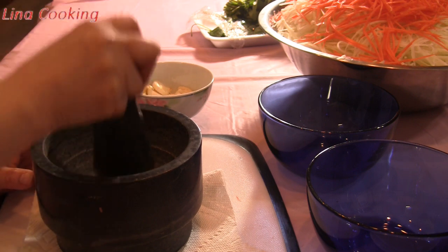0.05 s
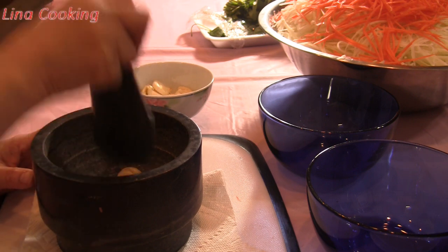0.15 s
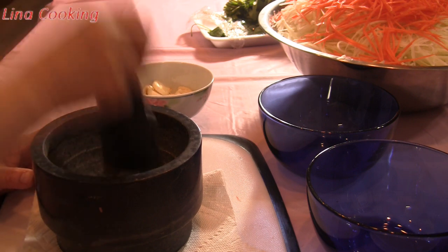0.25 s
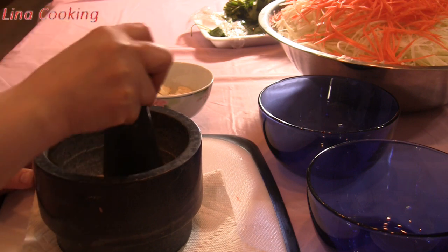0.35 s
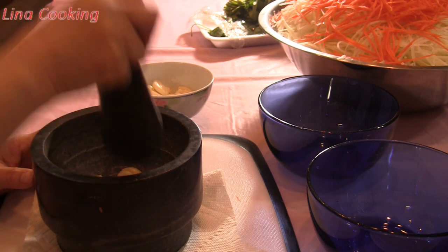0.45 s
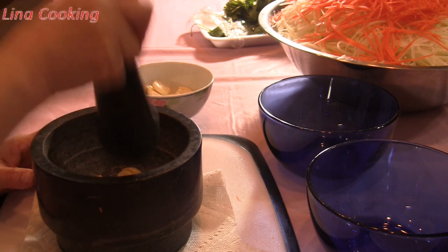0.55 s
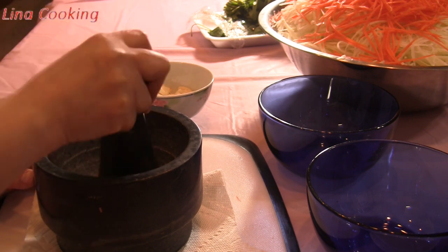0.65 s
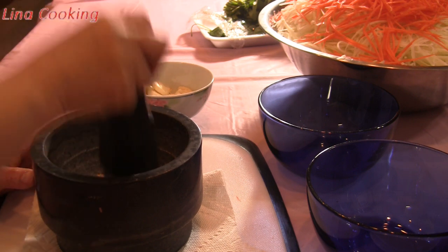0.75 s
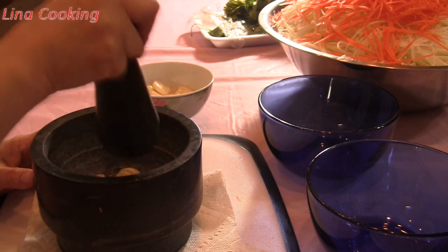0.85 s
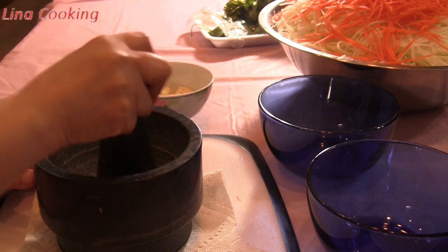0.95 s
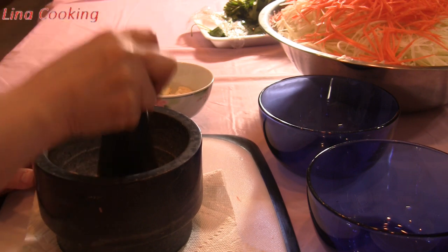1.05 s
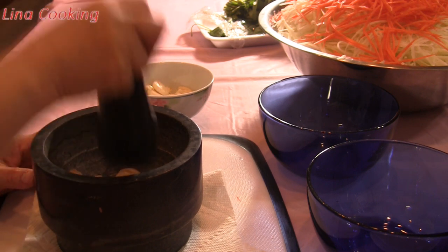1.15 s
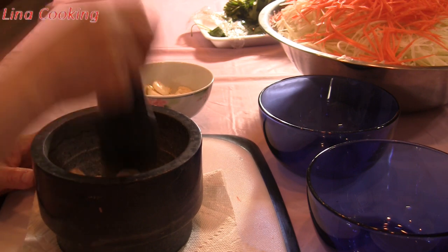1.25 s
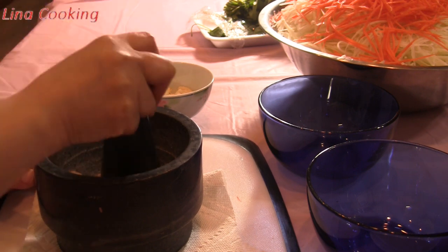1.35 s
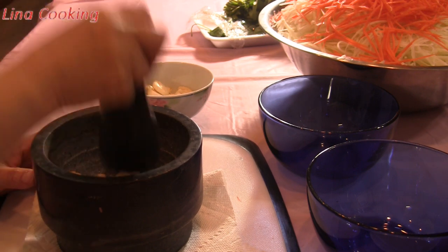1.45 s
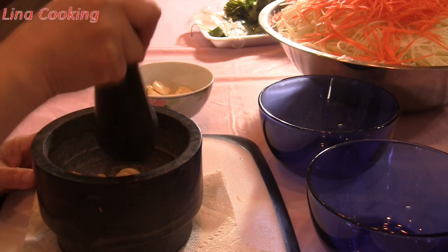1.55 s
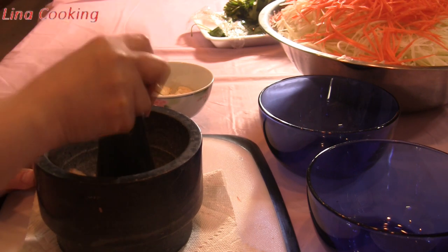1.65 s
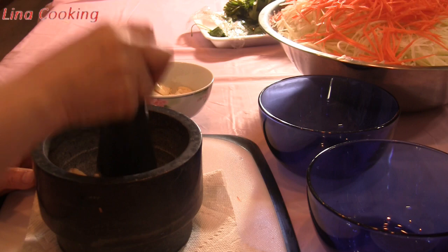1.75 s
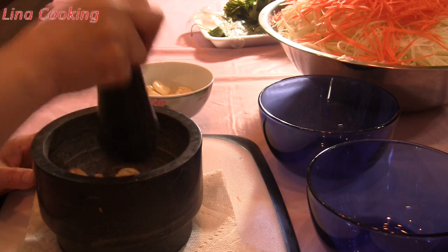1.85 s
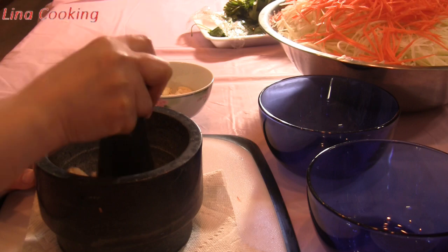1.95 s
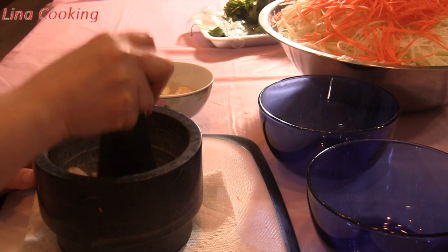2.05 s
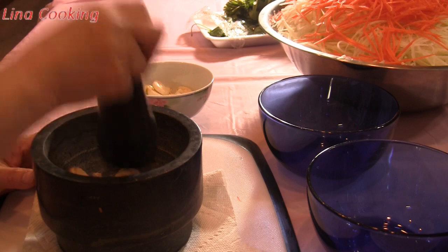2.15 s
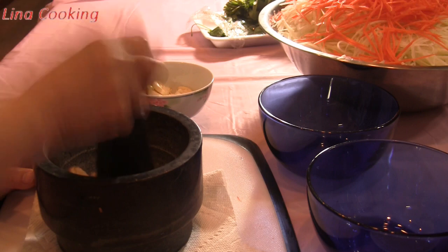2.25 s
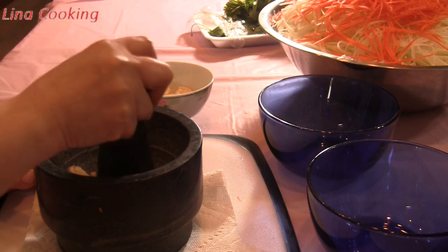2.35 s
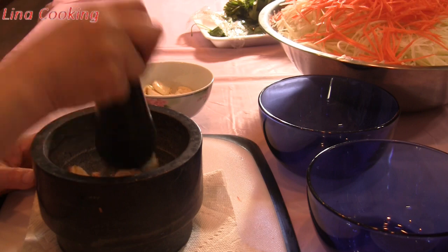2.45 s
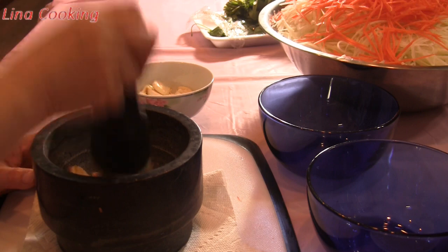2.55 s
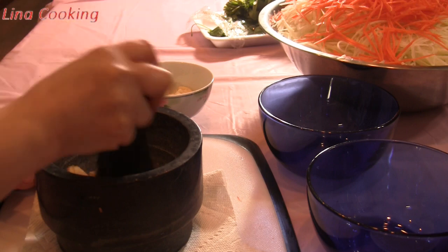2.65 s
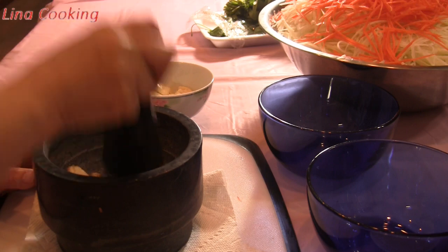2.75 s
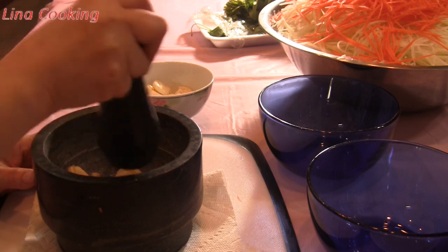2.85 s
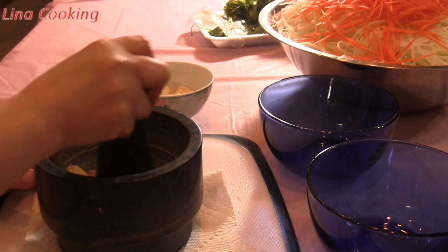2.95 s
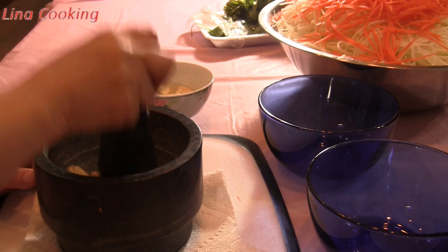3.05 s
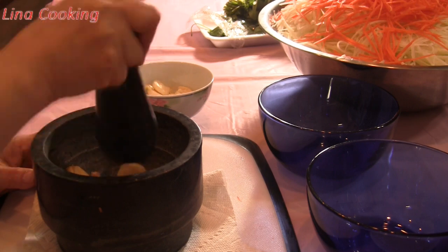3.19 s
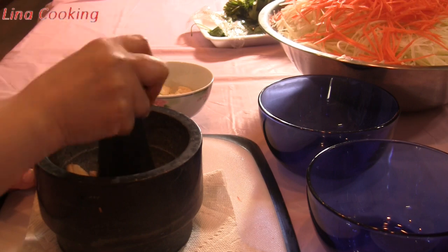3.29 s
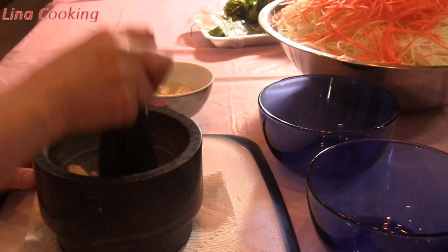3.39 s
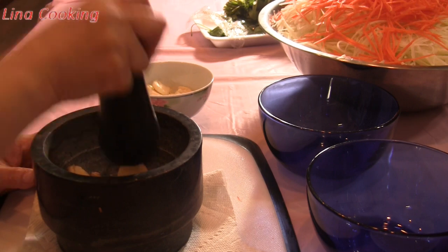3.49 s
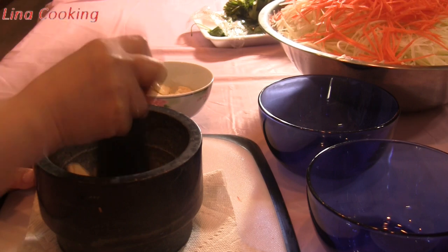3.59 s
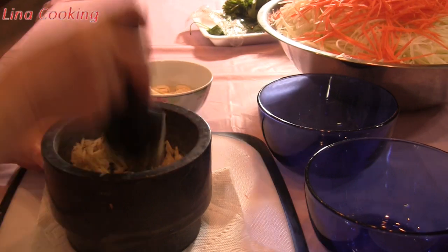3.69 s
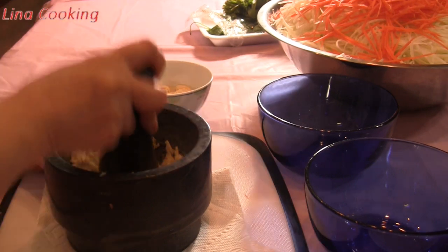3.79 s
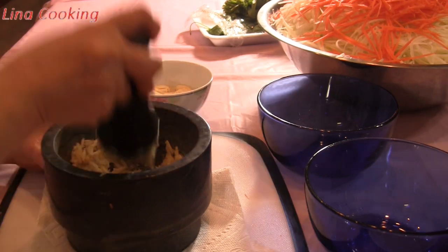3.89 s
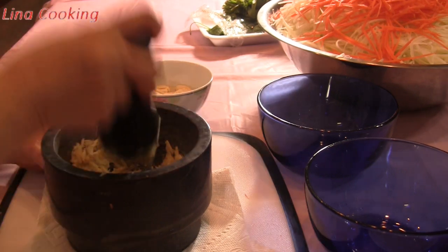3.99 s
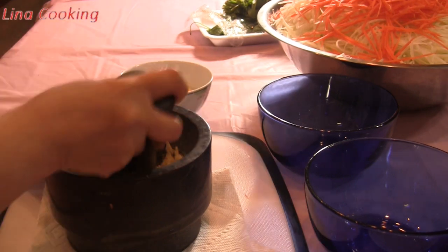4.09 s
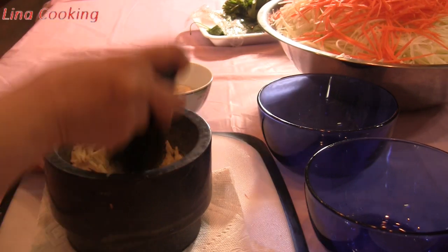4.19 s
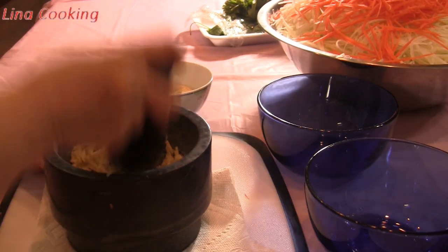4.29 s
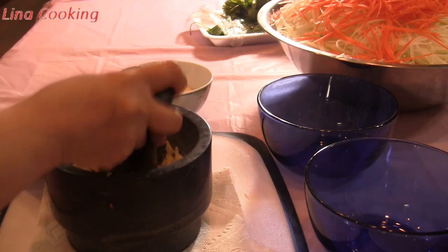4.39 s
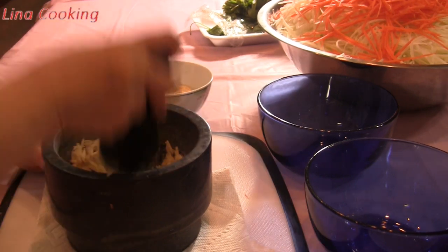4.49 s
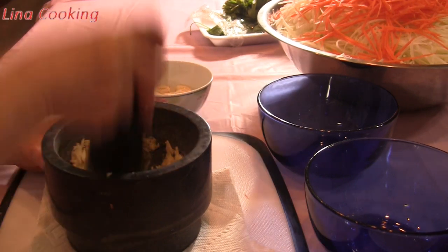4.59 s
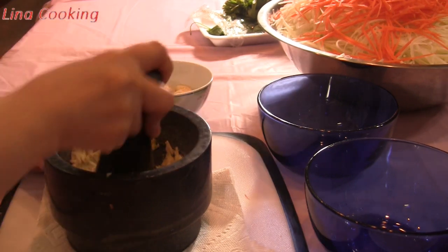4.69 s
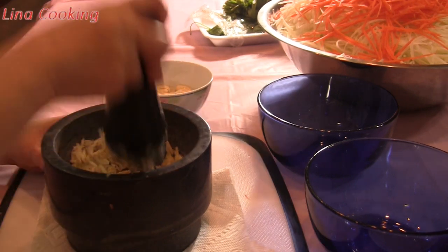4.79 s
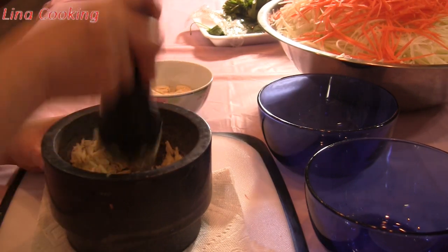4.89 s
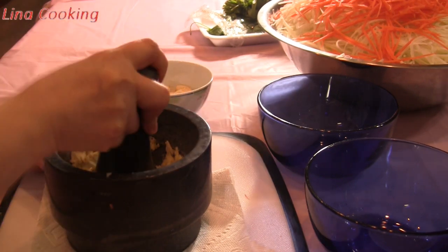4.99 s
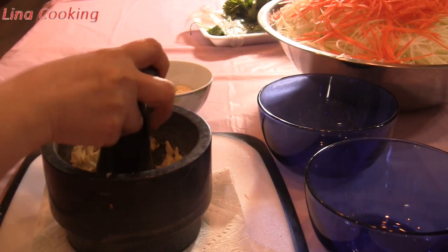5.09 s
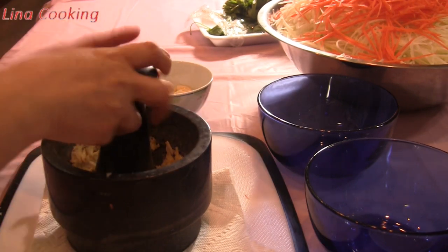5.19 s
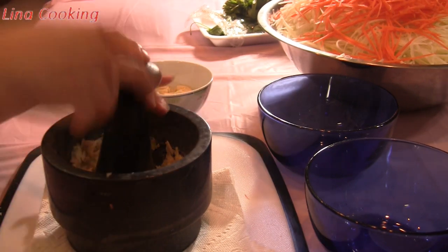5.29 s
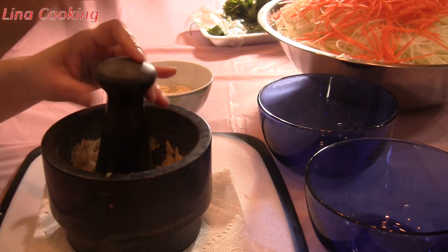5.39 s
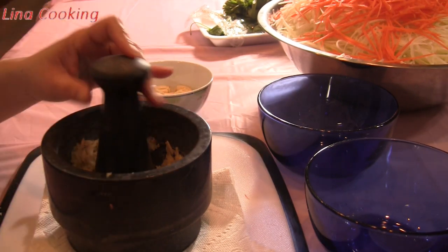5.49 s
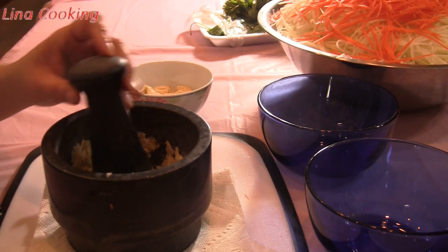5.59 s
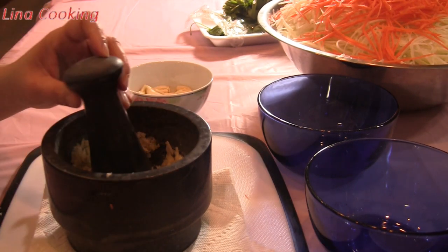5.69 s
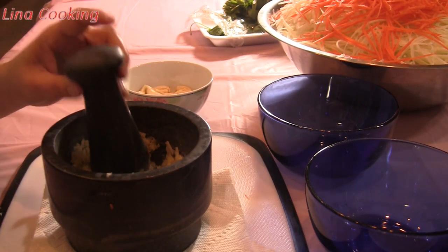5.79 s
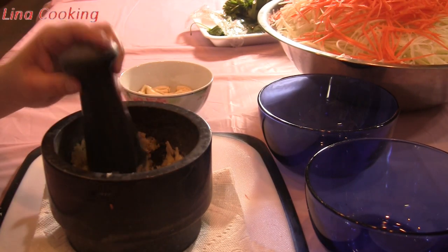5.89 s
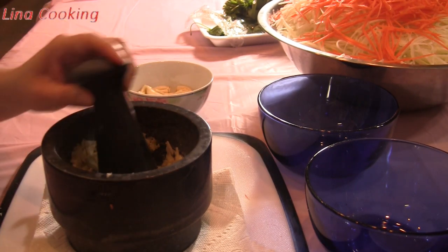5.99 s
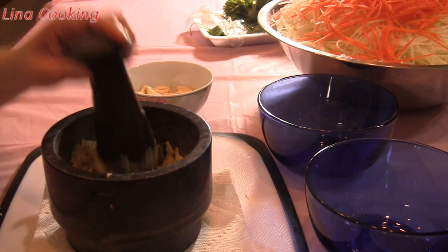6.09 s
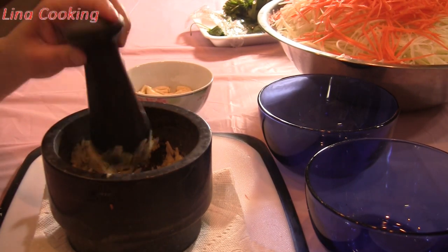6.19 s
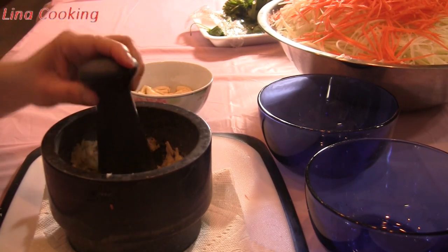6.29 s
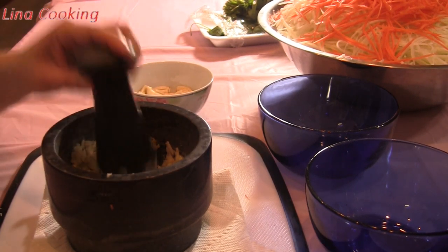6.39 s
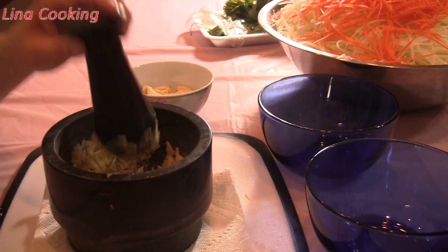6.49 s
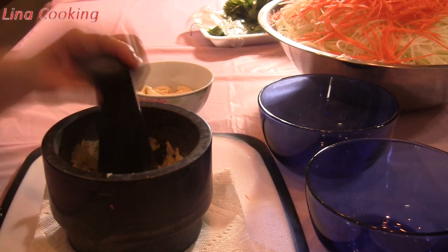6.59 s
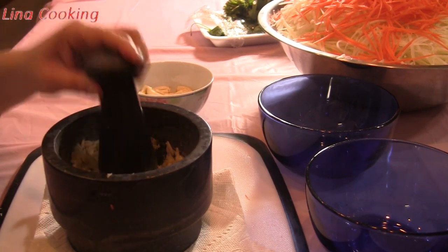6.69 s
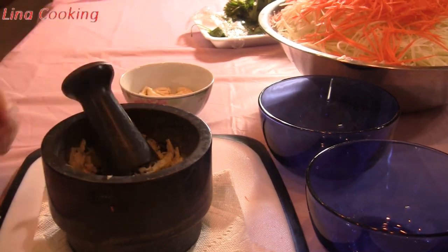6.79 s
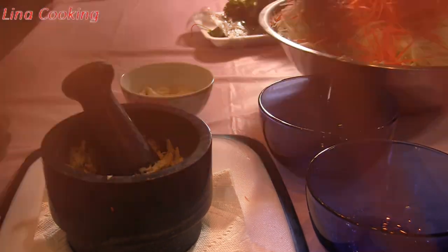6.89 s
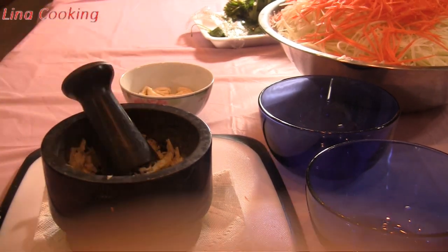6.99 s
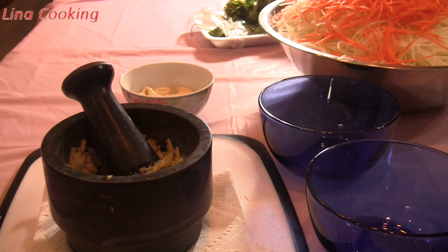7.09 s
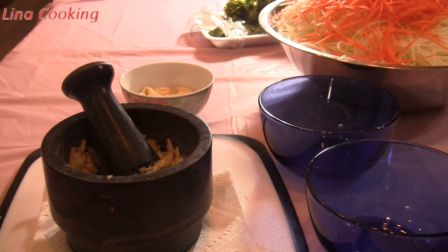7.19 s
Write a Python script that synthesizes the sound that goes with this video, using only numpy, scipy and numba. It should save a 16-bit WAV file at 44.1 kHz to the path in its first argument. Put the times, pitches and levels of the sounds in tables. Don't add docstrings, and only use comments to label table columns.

```python
import sys
import numpy as np
from scipy import signal
from scipy.fft import rfft, irfft, next_fast_len
from scipy.io import wavfile
from scipy.ndimage import uniform_filter1d, map_coordinates
from numba import njit

SR = 44100
rng = np.random.default_rng(int(sys.argv[2]) if len(sys.argv) > 2 else 0)


def magnitude_from_level(level_db):
    exponent = np.asarray(level_db, float) / 20
    return 10 ** exponent


def pcm_store(signal):
    levels = np.round(np.clip(np.atleast_2d(signal), -1, 1) * 32767)
    wavfile.write(sys.argv[1], SR, levels.astype(np.int16).T)


N = 319739
FADE = np.log(1000)

SHOT_STARTS_S = [0, 3.772, 6.858]
SHOT_FADES_S = [0.028, 0.00064, .001]

# frequency in Hz, density in dB per Hz.
AIR = [(15, -47), (25, -3.5), (123, -7.5), (200, -9.5), (503, -15.5), (863, -25), (1070, -24.5),
       (1190, -27.5), (1560, -27.5), (2350, -32), (2760, -33), (3160, -32.5), (16000, -44.5)]
AIR_DB, AIR_ALIKE_HZ = -48, 1415

# time the pestle bottoms out in seconds, force in dB,
# cushion in dB off the bite, crunch level in dB, crunch colour in Hz.
THUDS = [(0.0342, -37.5, 30, -14, 3010), (0.344, -25, 25.5, -20, 3060), (0.6717, -20, 21, -13.5, 1900),
         (1.0123, -11, 11.5, -15, 1800), (1.3573, -14, 11.5, -18, 3060), (1.6929, -10, 5.5, -13.5, 1660),
         (2.018, -10, 3, -15, 3080), (2.334, -9.5, 13, -16.5, 2940), (2.6602, -19.5, 14.5, -25.5, 2050),
         (2.9974, -11, 10.5, -17.5, 1950), (3.3245, -9, 13, -12, 5400), (3.6572, -14.5, 14, -16, 3900),
         (4.0923, -10.5, 8.5, -13.5, 4870), (4.683, -22.5, 15.5, -14, 5800), (5.982, -33, 18.5, -28, 5160),
         (6.3179, -28.5, 14, -17.5, 5250)]
# frequency in Hz, level in dB, T60 in seconds.
MAT_BOUNCE = [(212.4, 5.5, 0.025), (121.5, -1, 0.065), (420, -7, 0.007)]
# frequency in Hz, level in dB, T60 in seconds.
BOWL_AIR = [(766, 4.5, 0.024), (1088, -0.5, 0.0075), (1760, -4.5, 0.0073)]
# frequency in Hz, level in dB, T60 in seconds.
TABLE_MODES = [(84.6, -1.5, 0.37), (134.5, -12.5, 0.35), (173.4, 2.5, 0.17), (229, -4.5, 0.32),
               (253.5, -9.5, 0.48), (353, -6, 0.097), (384.3, 4, 0.11), (459, -14.5, 0.53)]
# frequency in Hz, density in dB per Hz.
TABLE_SHAKE = [(26, -49), (45, -17.5), (135, -0.5), (226, -10.5), (266, -16.5), (317, -11.5), (401, -17),
               (492, -21.5), (537, -21), (787, -22.5), (859, -34), (1500, -41), (1950, -72), (3300, -120)]
# frequency in Hz, density in dB per Hz.
CRUNCH = [(500, -26), (1000, -20.5), (1700, -10.5), (2400, -13), (3300, -9), (5000, -11), (8000, -8),
          (12000, -14), (15600, -10), (16500, -56)]
# frequency in Hz, density in dB per Hz.
PASTE = [(700, 2), (1500, -20.5), (2600, -7), (5000, -7), (8500, -7), (12000, -10), (15600, -25),
         (16500, -52.5)]
BURST_MS, SLOWEST_BURST_MS, BURST_STRETCH, SHARP_DB = 22.6, 87, 1.63, -14.5
CLOVE_PEAK_DB = 5.5
SINK_MS, SINK_MS_PER_DB, FIRM_DB, DEEPEST_DB = 3.0, 0.11, -10.5, 11
SAME_SHAKE = 0.55
DULL_PER_DB = 0.243
PASTE_MUFFLE = 0.47

# start in seconds, ring level in dB, pitch in Hz, spit level in dB.
TICKS = [(0.032, -23.5, 3030, -52), (0.045, -22, 2730, -34), (0.366, -31.5, 730, -50),
         (0.692, -25, 740, -52), (5.229, -47, 1140, -53), (5.38, -41.5, 1120, -51), (5.438, -58, 1100, -50),
         (5.454, -48, 1090, -43), (5.613, -54, 710, -48), (6.015, -43, 2910, -40), (6.047, -41, 2570, -50),
         (6.059, -43, 810, -42.5), (6.185, -39, 820, -63), (6.206, -40, 820, -65), (6.234, -44, 820, -59),
         (6.251, -34.5, 880, -56), (6.353, -32, 2600, -42), (6.529, -21, 1002, -41.5),
         (6.989, -33.5, 2400, -44.5), (7.077, -41, 716, -60), (7.174, -56, 3060, -42.5)]
TICK_T60_S, TICK_DAMPING = 0.015, 0.55

# start in seconds, crack, thump, mortar ring and pestle ring, all in dB.
KNOCKS = [
    (3.7824, 12, 0, -28.5, -28),
    (4.4002, 12.5, -1.5, -16.5, -30.5),
    (5.0050, 7, -3, -44, -48),
    (6.6626, 4, -9, -21, -32.5),
]
# frequency in Hz, level in dB, T60 in seconds.
CRACK = [(1140, 6.5, 0.0083), (715, -1, 0.0043), (1362, 1.5, 0.009), (1900, 6, 0.0024), (2400, 1, 0.0029),
         (3130, 1.5, 0.0016), (5620, -11, 0.00183), (9740, -12, .002)]
# frequency in Hz, density in dB per Hz.
GRIT = [(500, -11.5), (1500, 4.5), (2800, -2.5), (6000, -7.5), (12000, -15.5), (16500, -39)]
GRIT_DB, GRIT_T60_S = -15, 0.0074
MORTAR_HZ = [4104, 4100, 1147, 3138, 8338]
# level in dB, T60 in seconds.
MORTAR = [(4, .23), (-13, .5), (-7, .5), (-18, .4), (-4, .2)]
PESTLE_HZ = [8311, 8277, 8251, 12413, 12441, 13048, 13075, 13106, 13577, 9640, 11620]
# level in dB, T60 in seconds.
PESTLE = [(-8, .5), (-8, .5), (-9, .4), (-5, .4), (-7, .36), (-9, .4), (-8, .4), (-9, .4), (-17, .3),
          (-21, .3), (-21, .3)]
# frequency in Hz, gain in dB.
STONE_THUMP = [(60, -22), (130, -11), (230, 0)]
LEAD_DB, LEAD_PER_DB = 10, 2.24
GRIP_RATE, GRIP_DB = 110, 5.5

# peak time in seconds, level in dB, rise in seconds, fall in seconds.
RUSTLING = [
    (5.36, -60.5, 0.28, 0.97),
    (5.644, -53.5, 0.36, 0.34),
    (5.89, -44, 0.035, 0.072),
    (5.975, -43, .03, .2),
    (6.254, -41, 0.017, 0.014),
    (7.08, -51, .05, 0.17),
    (7.181, -42, .022, 0.14),
]
# frequency in Hz, density in dB per Hz.
RUSTLE = [(1200, -14), (2500, -3), (4000, -3), (7500, -1.5), (11000, 0.5), (15500, -7.5), (16500, -32.5)]
RUSTLE_RANGE_DB = 30
# start in seconds, length in seconds, level in dB, pitch in Hz.
DRAGS = [
    (5.753, 0.074, -43, 257),
    (5.767, 0.09, -45.5, 484),
    (5.767, 0.044, -54.5, 1090),
    (7.054, 0.068, -45, 580),
    (7.055, 0.12, -55.5, 2150),
    (7.134, 0.046, -49, 580),
    (7.185, 0.031, -51, 580),
    (7.211, 0.031, -46, 576),
]

# frequency in Hz, difference in dB.
PORTS = [(50, -4), (400, -4.5), (1200, -2), (2200, -7.5), (5000, -1), (14000, -2.5)]
PORT_LAG_S = 2.8e-5
# frequency in Hz, level in dB.
HOUSING = [(1200, -26), (3000, -9), (9000, -2), (15000, 2)]
HOUSING_DB, HOUSING_T60_S = -5, 0.005
# band frequency in Hz, level in dB, T60 in seconds.
KITCHEN = [(58.9, -12.5, 0.14), (142, -6.5, 0.52), (436, -7, 0.59), (693, -18.5, 0.87), (1470, -20.5, 0.74),
           (3230, -20, 0.68), (5540, -19.5, 0.82), (9000, -24, 0.56), (14000, -28, .35)]
# delay in ms, level in dB, frequency in Hz above which it is dull.
WALLS = [(12.58, -24.5, 5400), (14.46, -24.5, 500), (37.5, -20.5, 900)]
ROOM_ALIKE = 0.39
MIC_LOW_HZ = 66


def colour(x, points):
    hz, db = np.transpose(points)
    size = next_fast_len(x.shape[-1] + SR // 10)
    at = np.log(np.arange(size // 2 + 1) * SR / size + 1)
    gain = magnitude_from_level(np.interp(at, np.log(hz), db))
    return irfft(rfft(x, size) * gain, size)[..., :x.shape[-1]]


def unit(x):
    return x / np.sqrt(np.mean(x ** 2))


def ring(modes, push_ms, scatter_db=0., length_s=0.74, count=1):
    t = np.arange(int(length_s * SR)) / SR
    hz, db, t60 = np.transpose(modes)[:, :, None]
    db = db + scatter_db * rng.standard_normal(hz.shape)
    free = np.sum(magnitude_from_level(db) * np.sin(2 * np.pi * hz * t) * np.exp(-FADE * t / t60), axis=0)
    push = np.sin(count * np.pi * np.linspace(0, 1, int(push_ms * SR / 1000) + 3)[1:-1])
    if count > 1:
        push = push * np.linspace(0.2, 1, len(push))
    return signal.fftconvolve(free, push / np.abs(push).sum())[:len(t)]


def crackle(size, spread_db, points):
    snaps = rng.standard_normal(size) * magnitude_from_level(spread_db * rng.exponential(size=size))
    return unit(colour(snaps, points))


def patchy(size, rate, depth_db):
    k = int(SR / rate)
    steps = np.repeat(rng.standard_normal(size // k + 1), k)[:size]
    return magnitude_from_level(depth_db * uniform_filter1d(steps, k // 2 + 1))


def add(track, s, sound):
    i = max(int(s * SR), 0)
    stop = min([int(start * SR) for start in SHOT_STARTS_S if start > s] + [N])
    track[i:i + len(sound)][:stop - i] += sound[:stop - i]


def air():
    mid, side = colour(rng.standard_normal((2, N)), AIR)
    side = colour(side, [(50, -12), (AIR_ALIKE_HZ, -4), (8000, 0)])
    return magnitude_from_level(AIR_DB) * unit(mid + side * np.array([[1], [-1]]))


def shake(t60):
    t = np.arange(SR // 2) / SR
    blur = unit(colour(rng.standard_normal(len(t)), TABLE_SHAKE))
    blur = blur * np.exp(-FADE * t / t60) * np.minimum(t / 0.016, 1)
    return blur + magnitude_from_level(-7.5) * ring(TABLE_MODES, 1.16, 3.06, length_s=0.5)


def thuds():
    out, t = np.zeros(N), np.arange(SR // 3) / SR
    rise = 0.016
    same_shake = shake(0.29)
    for bottom, thud_db, cushion_db, crunch_db, clove_hz in THUDS:
        weak_db = FIRM_DB - thud_db
        s = bottom - (SINK_MS + SINK_MS_PER_DB * min(weak_db, DEEPEST_DB)) / 1000
        burst_ms = min(BURST_MS * magnitude_from_level(BURST_STRETCH * (SHARP_DB - crunch_db)), SLOWEST_BURST_MS)
        growth = np.exp(FADE * (t - rise) / 0.015)
        decay = np.exp(-FADE * (t - rise) / (max(burst_ms, 5) / 1000))
        swell = np.minimum(growth, decay)
        skin = magnitude_from_level(-17) * np.minimum(t / rise, 1) ** 4.0 * (t < rise)
        juice = magnitude_from_level(-9) * np.exp(-FADE * t / 0.33) * (t > rise)
        again = magnitude_from_level(-3.5) * np.exp(-((t - rise - 0.012) / 0.0004) ** 2)
        garlic = CRUNCH if s < SHOT_STARTS_S[1] else PASTE
        fibres = patchy(len(t), 300, 3.07) * crackle(len(t), 1.1, garlic)
        hollow = [(clove_hz / 1.16, 0), (clove_hz, CLOVE_PEAK_DB), (clove_hz * 1.4, 0)]
        burst = colour((swell + skin) * fibres, hollow)
        add(out, s + 0.00136 - rise, magnitude_from_level(crunch_db - 8) * (burst + (again + juice) * fibres))

        slow = np.clip(magnitude_from_level(0.37 * (cushion_db - 12.5)), 0.8, 1.8)
        bounce = ring(np.array(MAT_BOUNCE) * [1 / slow, 1, slow], 6.79 * slow, 0.9, count=3)
        add(out, bottom - 0.00409 * slow, magnitude_from_level(thud_db + 7) * bounce)
        muffle_db = -PASTE_MUFFLE * weak_db * (s > SHOT_STARTS_S[1])
        table = SAME_SHAKE * same_shake + np.sqrt(1 - SAME_SHAKE ** 2) * shake(0.33)
        table = colour(table, [(85, DULL_PER_DB * weak_db), (170, 0.0013), (450, muffle_db)])
        add(out, bottom + 0.00097, magnitude_from_level(thud_db - 3.0) * slow ** 0.23 * table)
        add(out, bottom - 0.001, -magnitude_from_level(thud_db - cushion_db) * ring(BOWL_AIR, 0.077, 0.68))
    return out


def ticks():
    out, t = np.zeros(N), np.arange(SR // 20) / SR
    for s, db, hz, spit_db in TICKS:
        t60 = TICK_T60_S * (1000 / hz) ** TICK_DAMPING
        modes = [(hz, 0, t60), (1.377 * hz, -5, t60), (0.756 * hz, -6, t60), (2.6 * hz, -10, t60 / 2)]
        body = ring(modes, 0.1, 2.0, length_s=0.05)
        spit = np.exp(-FADE * t / 0.005) * unit(colour(rng.standard_normal(len(t)), RUSTLE))
        add(out, s, magnitude_from_level(db + 1.5) * body[:len(t)] + magnitude_from_level(spit_db + 11.0) * spit)
    return out


def grip():
    return patchy(int(0.74 * SR), GRIP_RATE, GRIP_DB)


def knocks():
    out, t = np.zeros(N), np.arange(SR // 200) / SR
    for s, crack_db, thump_db, mortar_db, pestle_db in KNOCKS:
        lead = (t / t[-1]) ** 3.8 * crackle(len(t), 0.4, PASTE)
        add(out, s - t[-1], magnitude_from_level(LEAD_DB - LEAD_PER_DB * crack_db) * lead)
        add(out, s, -magnitude_from_level(crack_db) * ring(CRACK, 0.08, 1.0))
        grit = np.exp(-FADE * t / GRIT_T60_S) * crackle(len(t), 1.6, GRIT)
        add(out, s, magnitude_from_level(crack_db + GRIT_DB) * grit)
        add(out, s + 0.0011, -magnitude_from_level(thump_db) * colour(ring(MAT_BOUNCE, 3.28, count=2), STONE_THUMP))
        add(out, s + 0.0025, magnitude_from_level(thump_db - 21.0) * colour(shake(0.99), STONE_THUMP))
        add(out, s, magnitude_from_level(mortar_db) * ring(np.c_[MORTAR_HZ, MORTAR], 0.03) * grip())
        add(out, s, magnitude_from_level(pestle_db) * ring(np.c_[PESTLE_HZ, PESTLE], 0.03, 2.8) * grip())
    return out


def rubbing():
    out, now = np.zeros(N), np.arange(N) / SR
    rustle = crackle(N, 1.0, RUSTLE) * patchy(N, 55, 1.1)
    for s, db, rise_s, fall_s in RUSTLING:
        away = np.maximum((s - now) / rise_s, (now - s) / fall_s)
        out += rustle * magnitude_from_level(db - RUSTLE_RANGE_DB * away)
    for s, length_s, db, hz in DRAGS:
        t = np.arange(int(length_s * SR)) / SR
        near, far = 1 + hz / 6000, 1.19 + hz / 3000
        below = [(hz / 4, -60), (hz / far, -22), (hz / near, -5)]
        above = [(hz * near, -5), (hz * far, -22), (hz * 4, -60)]
        hum = unit(crackle(SR // 4, 2.0, below + [(hz, 0)] + above)[:len(t)])
        add(out, s, magnitude_from_level(db) * hum * np.sin(np.pi * (t / length_s) ** 0.7) ** 0.48)
    return out


def ports(x):
    half = np.array(PORTS) * [1, 0.5]
    late = map_coordinates(x, [np.arange(len(x)) - PORT_LAG_S * SR], order=3)
    direct = np.array([colour(x, half), colour(late, half * [1, -1])])
    t = np.arange(SR // 50) / SR
    scatter = colour(rng.standard_normal((2, len(t))), HOUSING) * np.exp(-FADE * t / HOUSING_T60_S)
    scatter = magnitude_from_level(HOUSING_DB) * scatter / np.linalg.norm(scatter, axis=1, keepdims=True)
    return direct + signal.fftconvolve(x[None], scatter, axes=1)[:, :len(x)]


def kitchen():
    t = np.arange(SR) / SR
    hz, db, t60 = np.transpose(KITCHEN)
    both, left, right = rng.standard_normal((3, SR))
    apart = colour(np.array([left, right]), [(100, -22), (1500, 5.0)])
    noise = rfft(np.sqrt(ROOM_ALIKE) * both + np.sqrt(1 - ROOM_ALIKE) * apart)
    at = np.log(np.arange(SR // 2 + 1) + 1)
    out = 0
    for k, share in enumerate(np.eye(len(hz))):
        band = irfft(noise * np.interp(at, np.log(hz), share), SR)
        level = magnitude_from_level(db[k]) * np.sqrt(2 * FADE / (t60[k] * SR))
        out = out + level * band * np.exp(-FADE * t / t60[k])
    out = out * np.clip((t - 0.003) / 0.00077, 0, 1)
    for ms, echo_db, dull_hz in WALLS:
        pulse = np.exp(-(2 * np.pi * dull_hz * (t - ms / 1000)) ** 2 / 2)
        out += magnitude_from_level(echo_db) * pulse / pulse.sum()
    return out


def scene():
    out = air()
    dry = thuds() + ticks() + knocks() + rubbing()
    echo = kitchen()
    tilt = magnitude_from_level(np.array([[-1.5], [1.5]]))
    edges = [int(start * SR) for start in SHOT_STARTS_S] + [N]
    for start, stop, fade_s in zip(edges, edges[1:], SHOT_FADES_S):
        shot = dry[start:stop]
        wet = signal.fftconvolve(shot[None], echo, axes=1)[:, :len(shot)]
        fade = np.minimum(np.arange(len(shot))[::-1] / (fade_s * SR), 1) ** 2
        out[:, start:stop] += (ports(shot) + tilt * wet) * fade
    return out


@njit
def follow(size, attack, release):
    out, e = np.empty(len(size)), 0.
    for i in range(len(size)):
        e += (size[i] - e) * (attack if size[i] > e else release)
        out[i] = e
    return out


def top_cut(x):
    return signal.sosfilt(signal.butter(12, 16380, fs=SR, output="sos"), x)


def record(dry):
    level = follow(np.abs(dry).max(axis=0), 1 / (0.0099 * SR), 1 / (0.12 * SR))
    held = dry * np.minimum(1, (magnitude_from_level(-15.5) / (level + 1e-9)) ** 0.62)
    low_cut = signal.butter(2, MIC_LOW_HZ, "high", fs=SR, output="sos")
    held = signal.sosfilt(low_cut, np.clip(held, -1.05, 1.05))
    held = colour(held, [(15200, 0), (16400, -7)])
    return top_cut(np.clip(held, -1, 1))


dry = scene()
out = record(dry)
pcm_store(out)
```